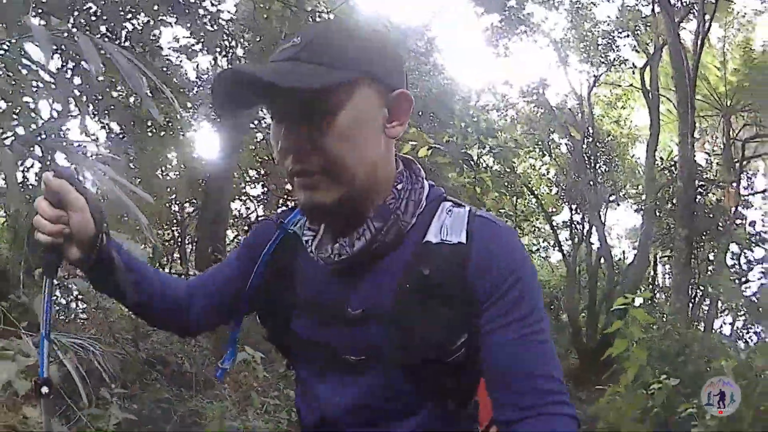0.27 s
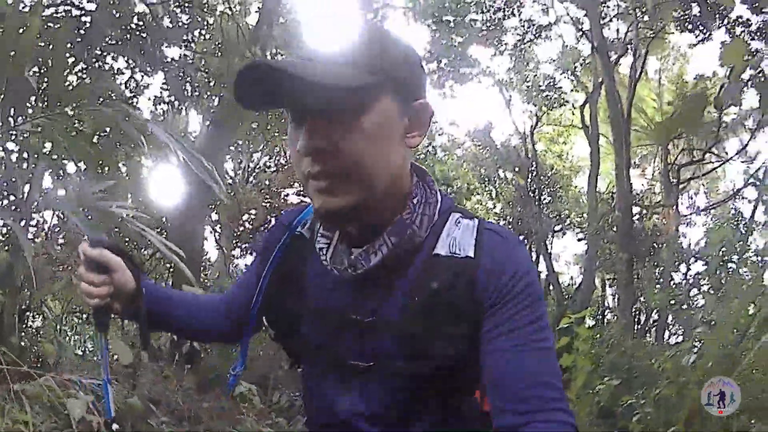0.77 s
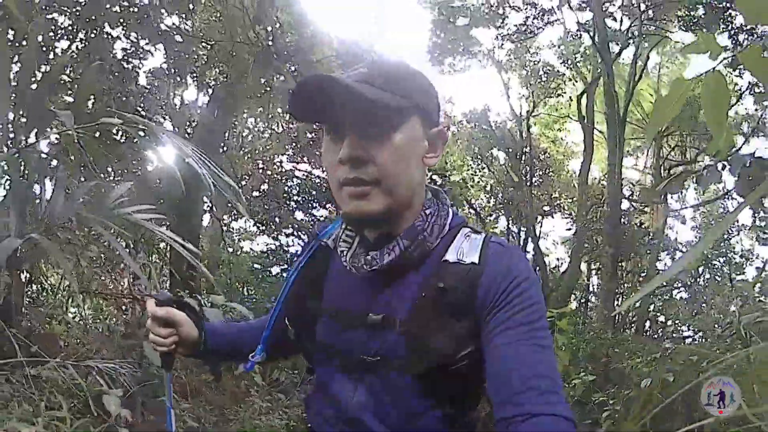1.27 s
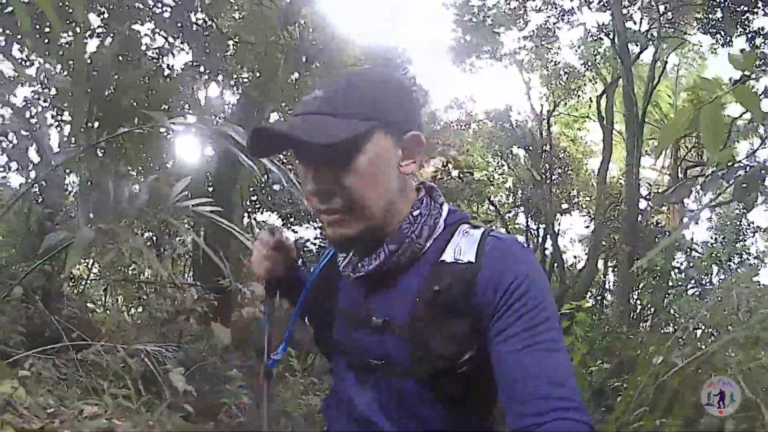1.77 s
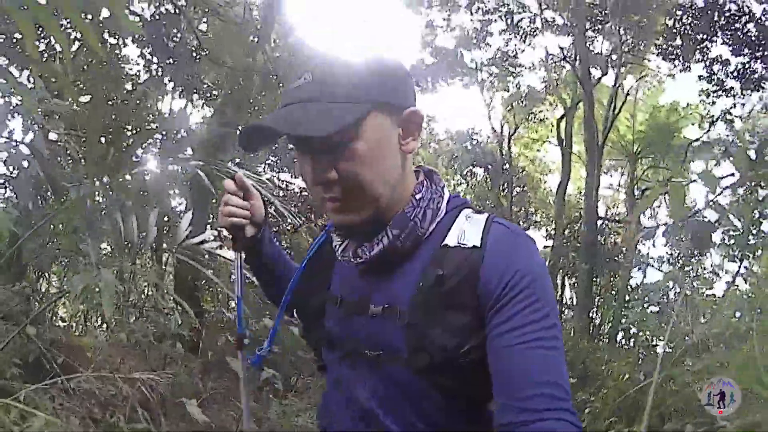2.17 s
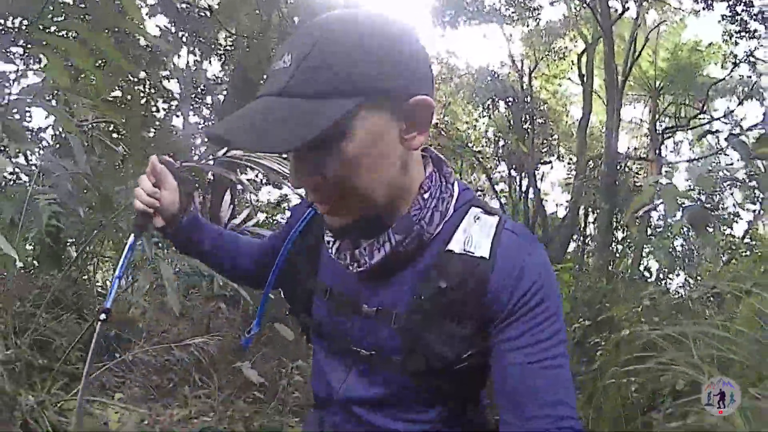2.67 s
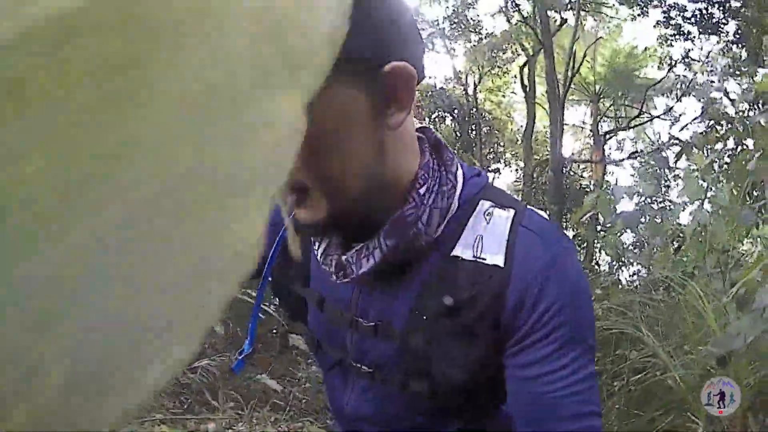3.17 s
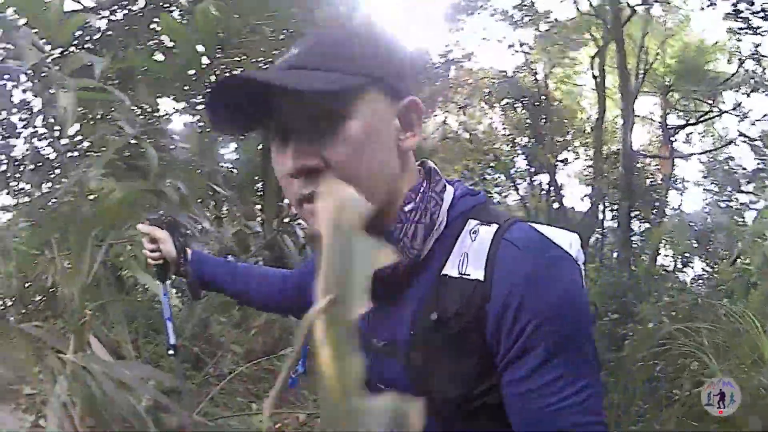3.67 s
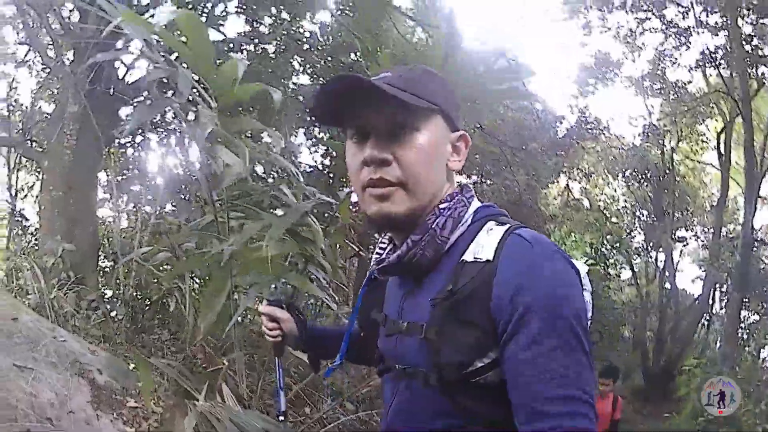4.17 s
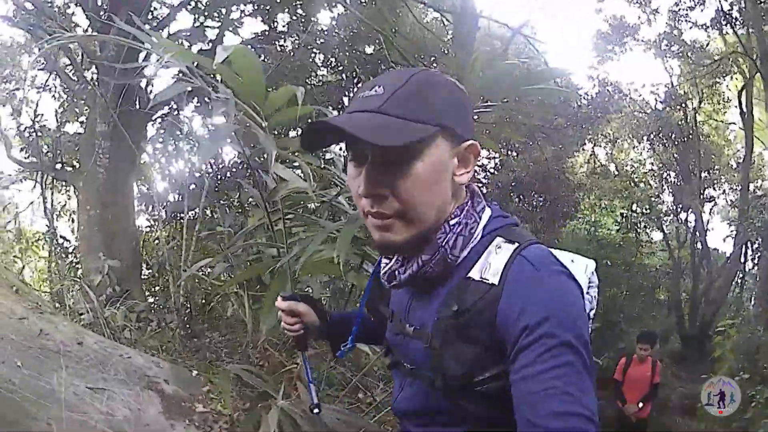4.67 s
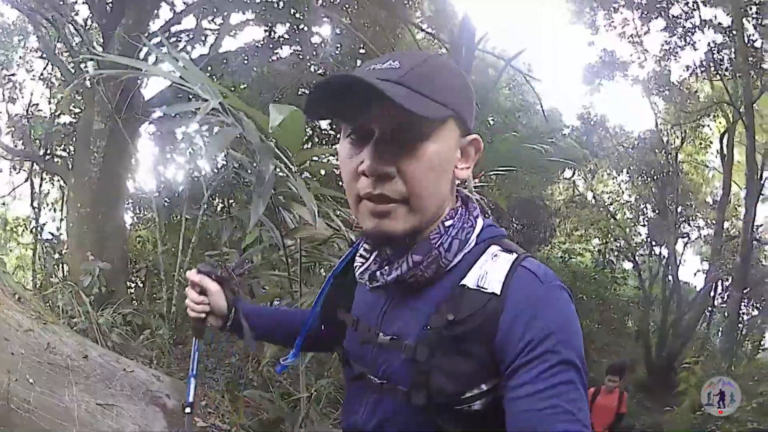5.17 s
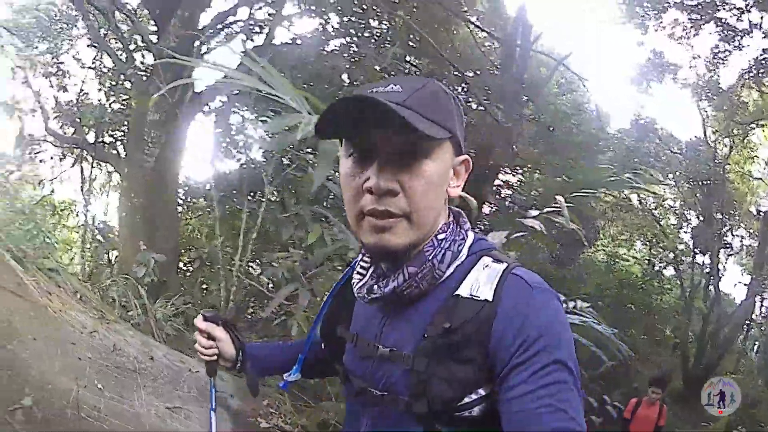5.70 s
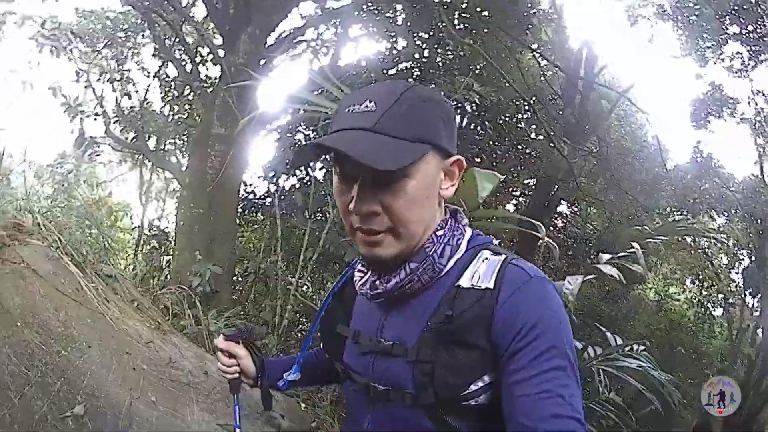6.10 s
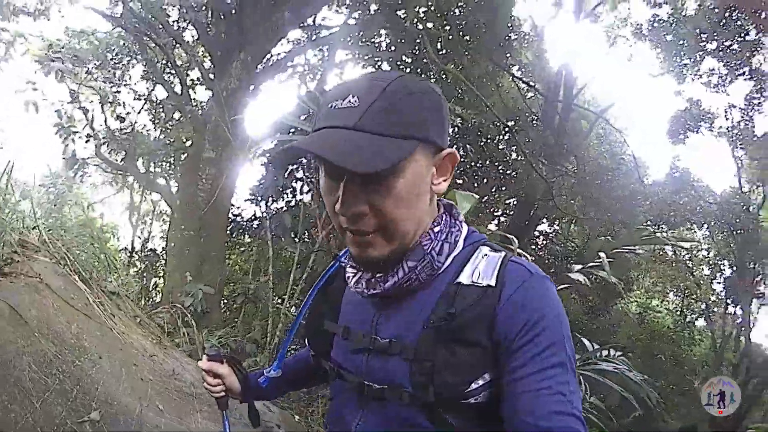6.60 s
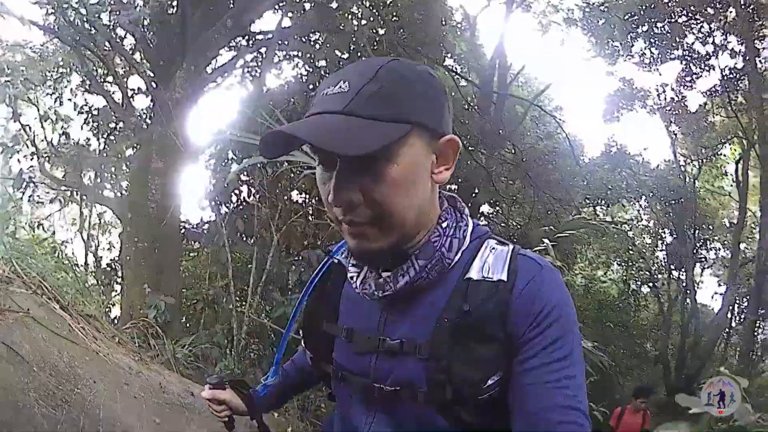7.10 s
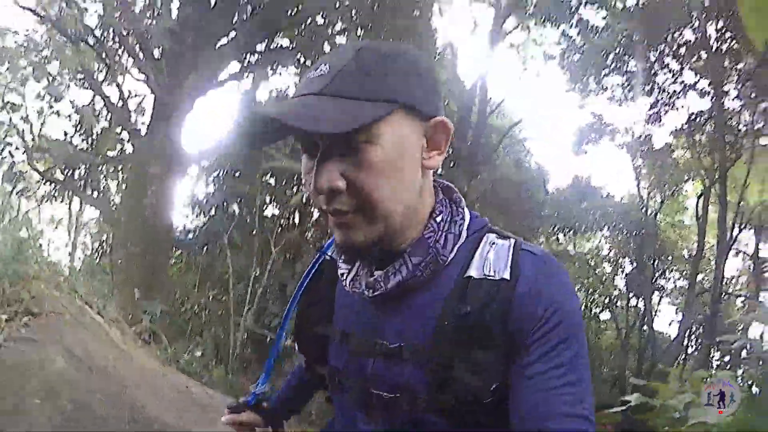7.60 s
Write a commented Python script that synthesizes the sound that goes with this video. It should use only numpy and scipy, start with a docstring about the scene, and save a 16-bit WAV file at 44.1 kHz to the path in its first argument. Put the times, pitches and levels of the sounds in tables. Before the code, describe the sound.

For the first three seconds, boots and a hiking pole land softly and unevenly on packed earth. Dry litter crunches, small twigs snap and plants swish against clothing, most clearly just before 2 seconds, with a slight handling rumble. Underneath are a quiet wash of air and foliage and the faint low hum of a far, idling engine. At about 2.9 seconds, broad leaves start dragging directly across the microphone: a loud, rough, boomy scrape with a fizzy edge and many sharp snaps, strongest until 3.7 and fading by 4.2. A heavier footfall thumps near 4.1. A second, somewhat lighter scrape with snaps runs from about 4.7 to 5.3, with another thump near 5.2. From around 5.5 seconds the faint engine revs up, dipping slightly at the end. Softer steps, crunches and twig ticks continue until nearly 8 seconds, without echo.

```python
"""A hiker with a pole climbs a dirt forest trail, a small camera held out in front of him.
First his boots thud softly, dry litter crunches and plants swish past, over a quiet forest and a far,
idling engine. Near 3 s, and again near 5 s, broad leaves scrape and snap across the camera case:
stick-slip friction drives its resonances. Then the faint engine revs up and the steps go on, softer."""
import sys
import numpy as np
from scipy import signal
from scipy.fft import rfft, irfft, next_fast_len
from scipy.io import wavfile
from scipy.ndimage import uniform_filter1d

SR = 44100
rng = np.random.default_rng(int(sys.argv[2]) if len(sys.argv) > 2 else 0)


def bounce(signal):
    """Save signal as a 16-bit WAV file at the path given by the first command-line argument."""
    frames = np.transpose(np.atleast_2d(signal))
    limited = np.clip(frames, -1, 1)
    pcm = np.round(limited * 32767).astype(np.int16)
    wavfile.write(sys.argv[1], SR, pcm)


N = 346080

# modes of the camera case: (f/Hz, bandwidth/Hz, relative level/dB)
CASE_MODES = [(906, 174, -1.5), (1300, 1200, -4.5), (1470, 250, 5), (2390, 350, -8.5)]
# spectra of the case's hollow, a leaf's push and its fizzing edge: (f/Hz, relative level/dB)
HOLLOW_SPECTRUM = [(60, -30.5), (130, -3.5), (210, -1), (300, -3.5), (520, -3.5), (750, -5), (1200, -7.5),
                   (3000, -60.5)]
PUSH_SPECTRUM = [(10, -17.5), (25, 4.5), (42, 3.5), (60, -4.5), (110, -1.5), (170, -18), (500, -56)]
FIZZ_SPECTRUM = [(1000, -16), (2200, 14), (2900, 3), (3650, 1), (4000, -32), (4350, -1.5), (4900, -9),
                 (6400, -9), (7200, -11), (9500, -14), (12000, -26.5), (14500, -27), (16000, -19)]


def leaves():
    """Stick-slip friction: one train of slips rings the case, booms and fizzes, over a low push."""
    slips = grains(per_s=550, spread_db=0.5, clump_db=3.2, clumps_per_s=120, smooth=0.35)
    # the contact wanders over the case, so each mode takes its turn
    ringing = sum((-1) ** k * from_db(db + 4.55 * drift(45)) * resonance(slips, hz, width)
                  for k, (hz, width, db) in enumerate(CASE_MODES))
    scrape = contact(-4.5, follows=0.82) * evened(low_pass(ringing, hz=2700))
    boom = contact(-3.5, follows=0.92, flat_share=0.97) * evened(colour(slips, HOLLOW_SPECTRUM))
    pressure = evened(colour(rng.standard_normal(N), PUSH_SPECTRUM))
    push = contact(-2, follows=0.82, flat_share=0.59) * pressure
    fizz = contact(-9.5, follows=0.85) * colour(slips, FIZZ_SPECTRUM)
    return scrape + boom + push + fizz


# how hard a leaf bears on the case, one table per drag: (t/s, contact level/dB)
LEAF_DRAGS = [
    [(2.86, -62), (2.901, -44.5), (2.931, -42.5), (3.035, -24), (3.059, -32.5), (3.085, -46), (3.11, -47)],
    [(3.11, -52), (3.135, -43.5), (3.197, -46.5), (3.253, -26.5), (3.354, -34), (3.375, -61)],
    [(3.375, -31), (3.46, -28), (3.48, -27.5), (3.588, -27), (3.648, -38), (3.66, -44)],
    [(3.66, -40.5), (3.7, -38), (3.751, -42), (3.779, -40), (3.905, -47.5), (4.033, -39), (4.061, -51.5),
     (4.087, -44), (4.32, -75.5)],
    [(4.53, -109), (4.59, -50), (4.647, -65), (4.669, -46.5), (4.721, -55), (4.863, -44), (4.889, -39.5),
     (5.102, -41.5), (5.125, -51)],
    [(5.125, -52), (5.162, -32.5), (5.19, -38.0), (5.288, -55), (5.42, -72.5)],
]
# extra boom of a leaf lying flat rather than on edge, one value per drag: (relative level/dB)
LEAF_FLATNESS = [1, 6, -3, -1.5, -2, 1.5]


def contact(level_db, follows, flat_share=0):
    """Power law: a friction layer's gain grows as contact ** follows, and with the leaf's flatness."""
    firm_db = -39   # firm contact, the reference for level_db
    return sum(from_db(firm_db + level_db + flat_share * flat_db)
               * (envelope(drag) / from_db(firm_db)) ** follows
               for drag, flat_db in zip(LEAF_DRAGS, LEAF_FLATNESS))


# leaf edges flicking the case: (t/s, relative peak level/dB, ring f/Hz, slipping time/s)
LEAF_FLICKS = [(2.8962, -20.5, 1730, 0.0045), (2.9481, -21.5, 1730, 0.00073), (2.9927, -25.5, 1250, 0.0011),
               (3.0143, -22, 850, 0.0054), (3.0199, -18.5, 540, 0.0071), (3.0369, -13, 910, 0.0034),
               (3.0545, -25, 720, .002), (3.0716, -24.5, 664, 0.00041), (3.2567, -22.5, 960, 0.0015),
               (3.3305, -20.5, 1020, 0.0031), (3.3433, -19, 1130, 0.0037), (3.3656, -30.5, 850, 0.0067),
               (3.4705, -36, 1490, .008), (3.4889, -21.5, 940, 0.004), (3.5105, -22, 1080, 0.014),
               (3.5453, -24.5, 1430, 0.0076), (3.565, -21.5, 1110, 0.0071), (3.5899, -20.5, 935, 0.0024),
               (3.7035, -18.5, 1060, 0.0056), (3.7706, -26, 930, 0.011), (3.8008, -23, 1330, 0.0042),
               (3.9513, -28.5, 1370, 0.0024), (4.0197, -34, 1500, 0.01), (4.0314, -27.5, 880, 0.0034),
               (4.1229, -31.5, 1210, 0.0052), (4.676, -38, 1080, 0.0043), (4.7451, -41.5, 1550, .005),
               (4.8015, -28.5, 1540, 0.0019), (4.8426, -17.5, 1950, 0.0024), (4.993, -29, 1210, 0.012),
               (5.04, -28.5, 885, 0.0032), (5.0818, -29, 1250, 0.00073), (5.0889, -28.5, 1240, 0.0083),
               (5.1031, -29, 1430, 0.0041), (5.1491, -22, 1350, 0.0041), (5.1847, -24.5, 1170, 0.0025),
               (5.2028, -30, 1170, 0.005), (5.334, -46, 1660, 0.0075)]


def flicks():
    """Impulse excitation: leaf edges snap on the case, with lighter catches that follow the contact."""
    catches = scattered(LEAF_DRAGS[0][0][0], LEAF_DRAGS[-1][-1][0], contact(-1.5, follows=0.87),
                        spread_db=0.5, hz=1310, slip_s=0.0057, count=30)
    return from_db(-1.66) * snaps(list(LEAF_FLICKS) + catches, damping=0.42, slip_hz=1232,
                                  crack_db=-6.5, case_db=-10, knock_db=-13, lead_in_db=-27.5,
                                  tail_db=-32, tail_s=0.012, dull_hz=3900)


# bright crack of a snap: (f/Hz, relative level/dB)
CRACK_SPECTRUM = [(1100, -18), (1800, -0.5), (2400, 5), (2950, 2), (3600, 0), (4300, -6), (5000, -9),
                  (5800, -12), (7000, -13.5), (9500, -19), (12000, -26), (14500, -31.5), (16000, -37.5)]


def snaps(rows, damping, slip_hz, crack_db, case_db, knock_db, lead_in_db, tail_db, tail_s, dull_hz):
    """Impulse response: each snap is a quick run of fading slips, with a ring, a crack and a knock."""
    lead = 256   # samples of faint lead-in before the snap
    out, t = np.zeros(N), (np.arange(4096) - lead) / SR
    for start, db, hz, slip_s in rows:
        slip_times = np.cumsum(np.r_[0, rng.uniform(0.7, 1.3, 24)]) / slip_hz
        sizes = np.r_[1, rng.uniform(0.6, 1, 24) * rng.choice([-1, 1], 24)]
        slips = np.zeros(len(t))
        slips[lead + (slip_times * SR).astype(int)] = sizes * np.exp(-(slip_times / slip_s) ** 2)
        # a faint, brief noise swells just before each snap
        lead_in = from_db(lead_in_db) * np.exp(-abs(t) / 0.0026)
        tail = from_db(tail_db) * np.exp(-abs(t) / tail_s)
        slips += np.where(t < 0, lead_in, tail) * rng.standard_normal(len(t))
        own_ring = peak_one(resonance(resonance(slips, hz, damping * hz), hz, hz))
        ring = peak_one(low_pass(own_ring + from_db(case_db) * peak_one(case(slips)), dull_hz))
        # a stiffer edge rings higher, cracks brighter and knocks less: 9.5 dB per octave
        stiffness_db = 9.5 * np.log2(hz / 1350)
        crack = from_db(crack_db + stiffness_db) * peak_one(colour(slips, CRACK_SPECTRUM))
        shove = rng.standard_normal(len(t)) * (t >= 0) * np.exp(-abs(t) / 0.007)
        knock = from_db(knock_db - stiffness_db) * peak_one(colour(shove, HOLLOW_SPECTRUM))
        add(out, start - lead / SR, from_db(db) * (ring + crack + knock))
    return out


def case(x):
    """Modal superposition: the camera case responds as the sum of a few broad modes."""
    return sum((-1) ** k * from_db(db) * resonance(x, hz, width)
               for k, (hz, width, db) in enumerate(CASE_MODES))


# boots and pole landing on packed earth: (t/s, peak level/dB, f/Hz)
LANDINGS = [(0.184, -50, 149), (0.343, -44.5, 208), (0.904, -36.5, 176), (1.247, -57, 82.7),
            (1.414, -51, 88), (1.622, -42.5, 85), (2.516, -42.5, 72), (4.095, -27.5, 63.4),
            (4.125, -33.5, 72), (4.569, -40, 233), (5.185, -30.5, 87), (5.331, -40.5, 205),
            (6.68, -50, 130), (6.72, -44, 190), (7.323, -62, 224)]
# crushed soil: (f/Hz, relative level/dB)
SOIL_SPECTRUM = [(30, 2), (90, -0.5), (200, -1), (500, -8.5), (900, -14), (2000, -35), (6000, -53)]


def steps():
    """Damped oscillation: each landing gives a low thump, with a short puff of crushed soil."""
    out, t = np.zeros(N), np.arange(8192) / SR
    for start, db, hz in LANDINGS:
        thump = np.sin(2 * np.pi * hz * t) * from_db(-60 * t * hz / 6.8)   # 60 dB down in 6.8 cycles
        soil = colour(rng.standard_normal(len(t)) * np.exp(-t / 0.027), SOIL_SPECTRUM)
        add(out, start, from_db(db) * (peak_one(thump) + from_db(-3.5) * peak_one(soil)))
    return out


# twigs and grit under boots and pole: (t/s, relative peak level/dB, ring f/Hz, slipping time/s)
TWIG_SNAPS = [(0.079, -68, 2000, .003), (0.5079, -48.5, 1230, 0.0051), (0.5865, -39.5, 1500, .003),
              (0.647, -45, 1390, 0.015), (0.9341, -52, 1120, 0.011), (0.9942, -48, 930, 0.003),
              (1.3937, -56.5, 980, 0.01), (1.7173, -43.5, 1730, 0.03), (1.7407, -46, 1410, 0.0066),
              (1.8624, -47, 2010, 0.01), (1.8963, -48, 1940, .006), (2.5475, -46, 766, 0.011),
              (2.6872, -44.5, 1410, 0.0066), (5.8707, -58, 1521, 0.0018), (6.228, -62.5, 860, 0.015),
              (7.3274, -51.5, 780, 0.0031), (7.541, -53, 1380, 0.0056), (7.5624, -52, 1170, 0.0036),
              (7.6248, -44.5, 1500, 0.0023), (7.7149, -61, 1960, 0.0057)]


def twigs():
    """Sudden release under load: twigs snap, and loose grit ticks faintly all along the way."""
    grit = scattered(LANDINGS[0][0], LANDINGS[-1][0], np.full(N, from_db(-62.5)),
                     spread_db=4, hz=1100, slip_s=0.001, count=24)
    return from_db(-1.2) * snaps(list(TWIG_SNAPS) + grit, damping=0.7, slip_hz=1422,
                                 crack_db=-5, case_db=-27.5, knock_db=-12, lead_in_db=-19,
                                 tail_db=-30.5, tail_s=0.036, dull_hz=4150)


# dry litter underfoot, and stems on clothing: (f/Hz, relative level/dB)
CRUNCH_SPECTRUM = [(150, -1), (300, -20.5), (550, -14), (900, 6), (1250, -0.5), (1550, 5.5), (2150, -3),
                   (2800, -1.5), (6000, -42.5)]
SWISH_SPECTRUM = [(1200, -5), (2100, -14), (2900, -11.5), (3400, 7), (4500, -0.5), (5200, -12.5),
                  (6000, -13), (7000, -22), (10000, -22.5), (11000, -23), (12000, -14.5), (13200, -29),
                  (15500, -43)]


def litter():
    """Granular noise: dry leaves crush underfoot; stems brush the clothes with the same grain, higher."""
    crunch, swish = strides()
    cracks = grains(per_s=640, spread_db=-5.5, clump_db=4, clumps_per_s=230, smooth=1)
    return crunch * evened(colour(cracks, CRUNCH_SPECTRUM)) + swish * colour(cracks, SWISH_SPECTRUM)


# a leg moving through litter and plants: (t/s, duration/s, crunch level/dB, swish level/dB)
LEG_STROKES = [(0.492, 0.08, -65, -77), (0.61, 0.16, -62.5, -70), (0.801, 0.09, -63, -71),
               (0.915, 0.17, -62.5, -68), (1.563, 0.27, -58, -66.5), (1.687, 0.079, -53, -50.5),
               (1.79, 0.038, -46, -48), (1.847, 0.032, -52, -45.5), (1.881, 0.063, -55, -62.5),
               (2.05, 0.034, -67, -84), (2.508, 0.22, -66.5, -80.5), (5.77, 0.13, -87, -90),
               (6.122, 0.038, -69, -88.5), (6.284, 0.042, -70, -79), (6.709, 0.27, -72.5, -93),
               (7.212, 0.095, -72, -83), (7.514, 0.078, -69.5, -90)]


def strides():
    """Two-stage decay: crunch and swish gains swell, hold, drop, then linger as the stems tremble."""
    attack_s, release_s, settle_s = 0.015, 0.0073, 0.047
    t, out = np.arange(N) / SR, np.zeros((2, N))
    for start, length, crunch_db, swish_db in LEG_STROKES:
        attack = np.clip((t - start) / attack_s, 0, 1)
        after = np.maximum(t - start - length, 0)
        release = np.maximum(np.exp(-after / release_s), from_db(-11.5) * np.exp(-after / settle_s))
        out += np.outer(from_db([crunch_db, swish_db]), attack * release)
    return out


# rumble through the camera's grip: (f/Hz, relative level/dB)
GRIP_SPECTRUM = [(12, 7), (30, 8.5), (55, -0.5), (80, 11), (115, -4.5), (145, 4.5), (200, -17), (300, -8),
                 (600, -47.5)]


def sway(lag_s=0.02):
    """Structure-borne sound: the arm sways just after each stride and rumbles through the grip."""
    t = np.arange(N) / SR
    crunch, _ = strides()
    effort = np.interp(t - lag_s, t, crunch)
    return from_db(-23) * effort ** 0.53 * evened(colour(rng.standard_normal(N), GRIP_SPECTRUM))


# far engine, idling and then revving up: (t/s, firing f/Hz, swell level/dB)
ENGINE_RUN = [(0, 72.54, -3.5), (1.0, 71.3, -1.5), (2.4, 70.7, 0.5), (5.399, 71.47, 5.5), (5.651, 80.07, 1),
              (6.6, 99.8, -3.5), (7.0, 105.3, 4), (7.351, 110.7, -1), (7.601, 103.5, 2), (7.85, 91.8, 7)]
# exhaust balance at each speed: (firing f/Hz, base level/dB of orders 1, 2 and 3)
EXHAUST_ORDERS = [(72.4, -74, -69, -85.5), (83.6, -64.5, -77, -82.5), (98.8, -62, -72, -78),
                  (109.2, -68, -66, -76.5)]


def engine(waver=0.008, fade_db=4):
    """Harmonic series: only the lowest firing orders carry this far, fading in and out on the way."""
    times, *columns = np.transpose(ENGINE_RUN)
    hz, swell_db = (np.interp(np.arange(N) / SR, times, column) for column in columns)
    speeds, *levels = np.transpose(EXHAUST_ORDERS)
    phase = 2 * np.pi * np.cumsum(hz * (1 + waver * drift(8.3))) / SR
    out = np.zeros(N)
    for order, db in enumerate(levels, start=1):
        gain = from_db(np.interp(hz, speeds, db) + swell_db + fade_db * drift(9.6))
        out += np.sqrt(2) * gain * np.sin(order * phase)
    return out


# forest background: (t/s, level/dB)
FOREST_LEVEL = [(0, -63.5), (0.4, -58), (1.3, -56.5), (5.6, -60), (7.85, -58)]
# air and foliage: (f/Hz, relative level/dB)
FOREST_SPECTRUM = [(12, -47.5), (25, 2), (85, -3), (125, -8), (205, -16), (320, -15.5), (550, -18.5),
                   (750, -23.5), (950, -23.5), (1500, -28.5), (2600, -33.5), (4000, -44), (5400, -45.5),
                   (15000, -69.5)]


def forest():
    """Broadband ambient noise: a low wash of air with a faint rustle of foliage."""
    rustle = grains(per_s=2700, spread_db=7.5, clump_db=4.2, clumps_per_s=8.3, smooth=1.5)
    return envelope(FOREST_LEVEL) * colour(rustle, FOREST_SPECTRUM)


def grains(per_s, spread_db, clump_db, clumps_per_s, smooth):
    """Shot noise: uneven clicks over smooth friction, coming in clumps but level in the long run."""
    sizes = from_db(spread_db * np.minimum(rng.exponential(1, N), 4)) * rng.choice([-1, 1], N)
    clicks = rms_one(sizes * (rng.random(N) < per_s / SR))
    friction = smooth * rng.standard_normal(N)
    return evened((clicks + friction) * from_db(clump_db * drift(clumps_per_s)))


def scattered(start, end, gain, spread_db, hz, slip_s, count):
    """Random point process: rows of small snaps, sized by a gain over time, pitched within an octave."""
    when, size, pitch = rng.uniform(-1, 1, (count, 3)).T
    times = start + (end - start) * (when + 1) / 2
    levels = 20 * np.log10(gain[(times * SR).astype(int)] + 1e-12) + spread_db * size
    return [(at, db, ring_hz, slip_s) for at, db, ring_hz in zip(times, levels, hz * 2 ** (pitch / 2))]


def colour(x, spectrum):
    """Minimum-phase (causal) filter with the given spectrum; output rms 1."""
    size = 2 * next_fast_len(len(x) // 2 + 2048)
    hz, db = np.transpose(spectrum)
    grid = np.maximum(np.arange(size // 2 + 1) * SR / size, 1)
    cepstrum = irfft(np.log(from_db(np.interp(np.log(grid), np.log(hz), db))))
    cepstrum[1:size // 2] *= 2
    cepstrum[size // 2 + 1:] = 0
    return rms_one(irfft(rfft(x, size) * np.exp(rfft(cepstrum)))[:len(x)])


def resonance(x, hz, width):
    """Damped resonator with peak gain 1."""
    r = np.exp(-np.pi * width / SR)
    feedback = [1, -2 * r * np.cos(2 * np.pi * hz / SR), r * r]
    return signal.lfilter(np.array([1, 0, -1]) * (1 - r * r) / 2, feedback, x + 1e-18)


def low_pass(x, hz):
    """Second-order low-pass."""
    return signal.sosfilt(signal.butter(2, hz, fs=SR, output="sos"), x)


def envelope(rows):
    """Gain over time from (t/s, level/dB) rows, silent outside their span."""
    times, db = np.transpose(rows)
    return from_db(np.interp(np.arange(N) / SR, times, db, left=-200, right=-200))


def drift(rate):
    """Random modulation of rms 1 that changes about rate times a second."""
    knots = rng.standard_normal(8192)
    return rms_one(np.interp(np.arange(N) / SR * rate, np.arange(len(knots)), knots))


def evened(x, size=1300):
    """Hold the running rms at 1, leaving only the fine grain."""
    return x / np.sqrt(uniform_filter1d(uniform_filter1d(x ** 2, size), size) + 1e-9)


def peak_one(x):
    """Scale the loudest 3 ms to rms 1."""
    return x / np.sqrt(uniform_filter1d(x ** 2, 132).max() + 1e-20)


def rms_one(x):
    """Scale to rms 1."""
    return x / np.sqrt(np.mean(x ** 2) + 1e-20)


def from_db(db):
    """Decibels to gain."""
    return 10 ** (np.asarray(db) / 20)


def add(out, start, sound):
    """Mix a sound in at start seconds."""
    at = round(start * SR)
    out[at:at + len(sound)] += sound[:N - at]


def scene():
    """Free-field superposition: the sources add in the open air, without reverberation."""
    return (leaves() + flicks() + steps() + twigs() + litter() + sway() + engine() + forest())[None]


def record(dry):
    """Band limiting: the microphone port notches the treble, faint self-noise joins, the top is cut."""
    port_notch = signal.butter(2, (6570, 9540), "bandstop", fs=SR, output="sos")
    top_cut = signal.ellip(10, 0.3, 70, 15600, fs=SR, output="sos")
    hiss = from_db(-99) * rng.standard_normal(dry.shape)
    return signal.sosfilt(top_cut, signal.sosfilt(port_notch, dry) + hiss)


dry = scene()
out = record(dry)
bounce(out)
```